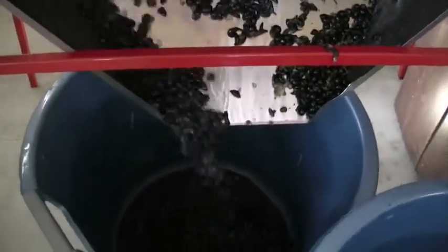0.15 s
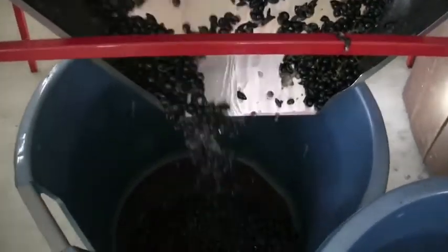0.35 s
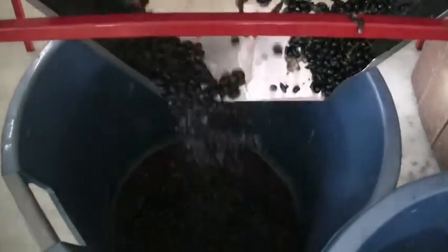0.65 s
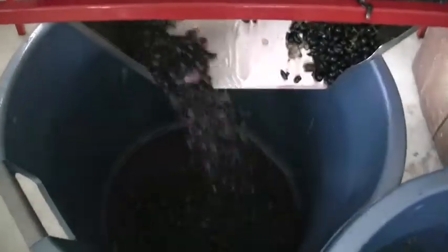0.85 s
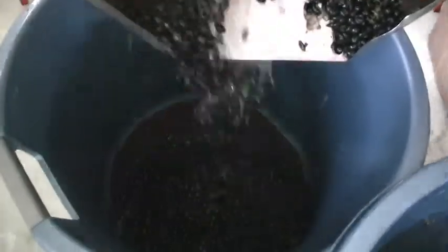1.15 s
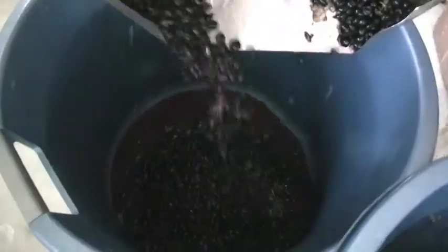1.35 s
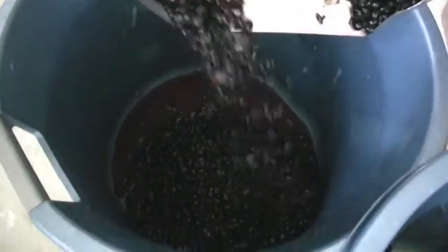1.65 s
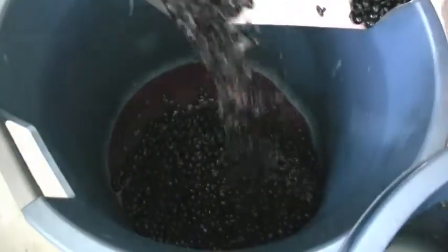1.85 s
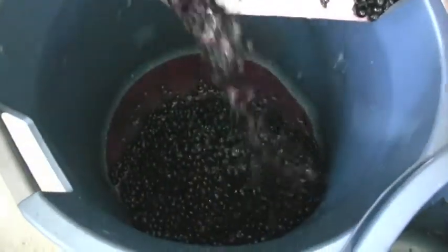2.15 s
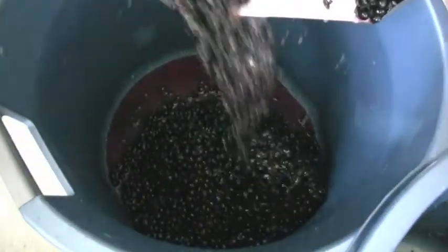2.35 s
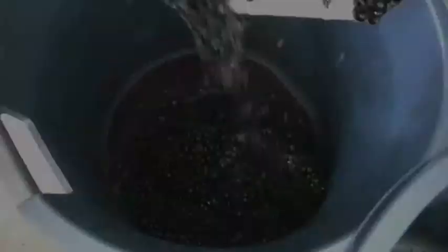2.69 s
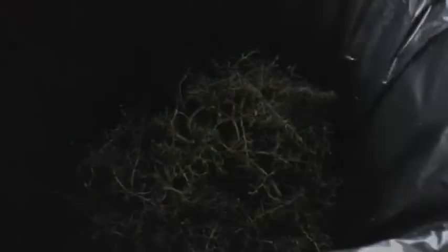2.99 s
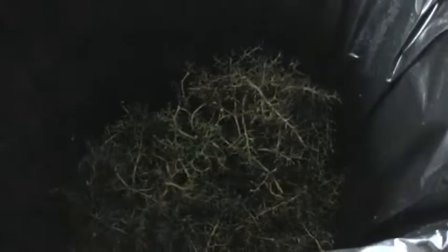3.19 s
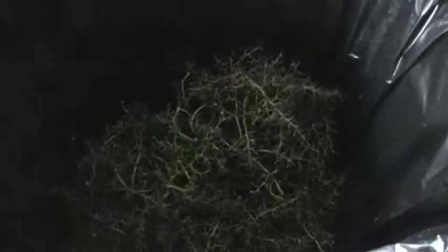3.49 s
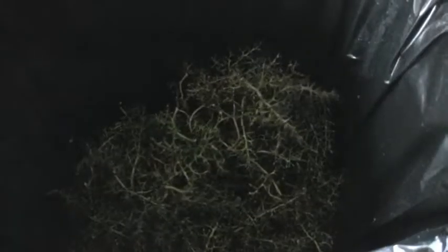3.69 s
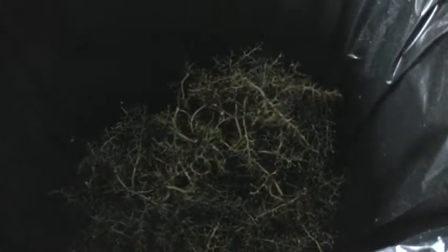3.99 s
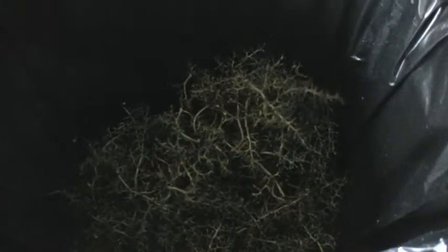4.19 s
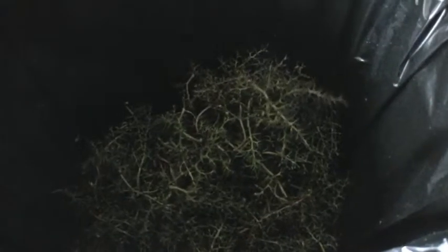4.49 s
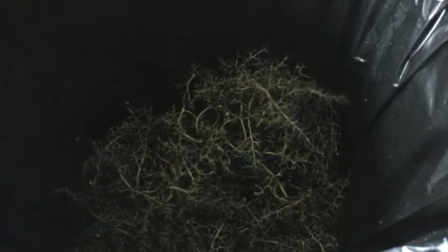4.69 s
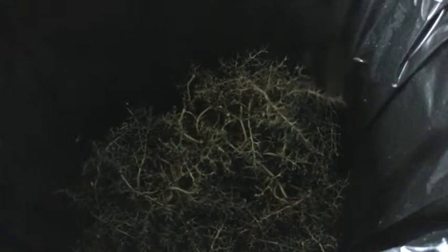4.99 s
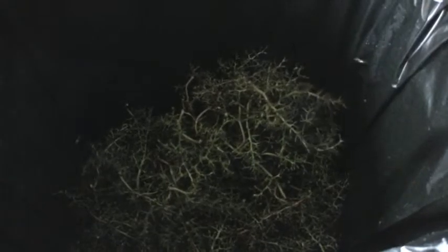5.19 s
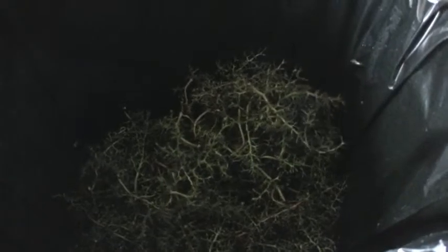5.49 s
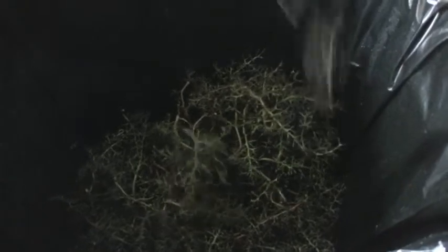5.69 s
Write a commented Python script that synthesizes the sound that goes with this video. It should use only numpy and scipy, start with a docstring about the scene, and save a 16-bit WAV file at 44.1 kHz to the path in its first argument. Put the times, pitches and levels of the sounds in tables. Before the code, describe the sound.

From the start to about 2.7 s, a grape crusher runs steadily, heard closely in stereo above a vat in a small hard-walled room. Its paddles make a dense, rough mid-low clatter, throbbing slightly about eight times a second, with irregular heavier thuds and a faint motor hum. Steel parts drone around 400 and 800 Hz, wavering, with a thin high rubbing ring. Over this, wet berries pour as a bright, wide shower of tiny clicks, with splats and sharp cracks growing busier from about 1 s and especially strong near 2.4 s. From 2.7 s everything fades, nearly silent just before 3 s. The booming panel rises first, and by 3.3 s the full machine is back above the stem bin: hollower, with uneven surges near 280 Hz and several knocks around 3.3 to 3.5 s. Dry stalks rustle faintly, with occasional small snaps, until the machine sound is cut off while still running at about 5.9 s.

```python
"""Grape crusher in a winery

A motor-driven crusher-destemmer runs in a small hard-walled winery. Its paddles beat bunches round a steel drum:
random knocks ring the housing, and narrow bands of noise make steel parts drone over the motor's humming sines.
First we are above the vat, where wet berries pour and splat as showers of tiny clicks.
After a fade almost to silence we are above the stem bin: the housing booms and stalks drop with a light rustle."""
import sys
import numpy as np
from scipy import signal
from scipy.fft import rfft, irfft, next_fast_len
from scipy.io import wavfile
from scipy.ndimage import uniform_filter1d, map_coordinates

SR = 44100
rng = np.random.default_rng(int(sys.argv[2]) if len(sys.argv) > 2 else 0)


def waveform_to_disk(signal):
    """Save audio, clipped to [-1, 1], as 16-bit WAV at the path in sys.argv[1]."""
    frames = np.transpose(np.atleast_2d(signal))
    scaled = np.clip(frames, -1, 1) * 32767
    samples = np.round(scaled).astype(np.int16)
    wavfile.write(sys.argv[1], SR, samples)


N = 257984
TIME = np.arange(N) / SR  # seconds
PADDED = 2 * next_fast_len(N // 2 + SR // 4)  # room for filters to ring out
FREQS = np.maximum(np.arange(PADDED // 2 + 1) * SR / PADDED, 1)  # Hz
VAT, BIN = 0, 1  # the two places; tables with two parts list the vat first

# All levels in the tables are relative: each sound's own settings can shift them.
# Ringing notes of the steel housing. Each row: pitch in Hz, width in Hz, boost in dB at the vat, then at the bin.
HOUSING_MODES = [(172, 23, 2, 1), (193.8, 14, 5.5, 7), (252, 7.8, 0, 1.5), (287.3, 93, 6.5, 14.5),
                 (346, 9.7, 5, 12.5), (401, 21, 2.5, 9), (474.4, 51, 4, 7.5), (497.5, 57, -4, 9),
                 (553, 41, 0, 5.5), (616, 91, 3.5, 8.5), (679.5, 61, -3, 8.5), (808, 170, 6.5, 8),
                 (912, 110, 2.5, 1.5), (1098, 138, 7, 4.5), (1198, 89, 7, 1.5), (1354, 85, 4, -6),
                 (1454, 134, 7, 7.5), (1682, 46, 7.5, 1.5), (1960, 160, 1.5, 0.5), (2230, 130, 7, 5),
                 (2963, 120, -3, 12), (7120, 630, 13, 9)]
# Broad colour of the blows. Each row: frequency in Hz, level in dB at the vat, then at the bin.
BLOW_COLOUR = [(30, -69, -44), (60, -25, -29), (98, -14, -20), (157, -4, -8.5), (264, -0.7, -2.5),
               (493, 3, -10), (1000, -11.5, -7.5), (1750, -12.5, -13.5), (2390, -25.5, -23.5),
               (3790, -29, -38), (6700, -46, -43), (9260, -34, -38), (11800, -51, -72)]
# Load on the paddles, one list per place. Each row: time in seconds, clatter level in dB.
LOAD = [
    [(0.0, -25.5), (2.7, -27)],
    [(3.3, -27), (5.85, -27.5)],
]
# Turning of the shaft, one row per place: turns per second, time of one throb's peak in seconds.
SHAFT = [(8.12, 0.102), (8.46, 3.213)]
# Beats of the clatter, one list per place. Each row: beats per turn of the shaft, depth in dB.
BEATS = [
    [(1, 0.35), (2, 0.4), (4, 0.3), (6, 0.35)],
    [(1, 0.6), (6, 0.5), (8, 0.45)],
]
# Heavy bunches thud on the housing. Each row: time in seconds, size in dB over the clatter's blows.
KNOCKS = [(0.303, 23), (0.614, 30), (1.09, 26), (1.28, 22), (1.504, 18), (1.75, 22), (2.034, 19),
          (2.095, 21), (2.177, 26), (3.286, 31.5), (3.404, 28.5), (3.445, 11), (3.546, 28), (3.82, 20),
          (4.368, 28), (4.66, 24), (4.753, 15), (5.089, 8), (5.412, 26)]
# Drone of the drum wall, one row per place: width in Hz, level in dB, throb depth in dB.
DRUM = [(29.7, 1.5, 1.2), (39.2, 2.5, 2.0)]
# How that drone shifts as bunches tumble, one list per place.
# Each row: time in seconds, pitch in Hz, level in dB.
DRUM_SWELL = [
    [(0.0, 410, -25.5), (0.05, 404.4, -27), (0.12, 438, -51), (0.19, 399.7, -36), (0.48, 408.7, -33),
     (0.55, 435, -49), (0.58, 426, -27.5), (0.65, 402, -40), (0.69, 435, -55), (0.72, 420.8, -32.5),
     (0.81, 394, -27.5), (0.86, 424, -44), (0.91, 401.2, -25.5), (1.04, 399.7, -40), (1.12, 385.8, -24),
     (1.21, 437.2, -34), (1.41, 389.8, -31), (1.44, 424.8, -30), (1.67, 435.5, -32), (1.71, 392, -28.5),
     (1.77, 433.4, -32), (1.95, 399, -29), (1.99, 431.2, -31.5), (2.2, 439, -29), (2.25, 417, -37),
     (2.34, 396.6, -27.5), (2.39, 397.6, -50), (2.43, 404.6, -28), (2.46, 399, -42), (2.53, 424.3, -29),
     (2.78, 421.1, -31), (2.8, 423.1, -31)],
    [(3.25, 449.4, -33), (3.36, 449.4, -25), (3.38, 445.7, -32.5), (3.94, 422.2, -34.5), (3.98, 415, -44),
     (4.06, 437.4, -35.5), (4.31, 415.7, -35), (4.54, 446.5, -31), (4.67, 414.7, -29), (4.81, 445.9, -36),
     (4.99, 421.6, -32), (5.03, 415.7, -45), (5.08, 442.4, -32), (5.24, 421.4, -27), (5.27, 414.4, -54),
     (5.33, 433.4, -33), (5.41, 455.6, -32.5), (5.73, 421.0, -35), (5.75, 415.7, -56), (5.85, 448, -36)],
]
# Uneven surges of the main panel at the bin. Each row: time in seconds, pitch in Hz, level in dB.
BOOM = [(2.97, 283, -46.5), (3.11, 280.7, -24.5), (3.23, 294.7, -34), (3.31, 277.7, -29),
        (3.39, 296.8, -22), (3.47, 297.3, -37), (3.53, 282.6, -25), (3.6, 281.6, -27), (3.63, 291.1, -19),
        (3.76, 284.3, -31), (3.81, 280.9, -23.5), (3.87, 287.9, -27), (3.92, 276.8, -24),
        (4.05, 283.9, -28.5), (4.08, 283.9, -23), (4.13, 295.6, -24), (4.2, 272.2, -34),
        (4.25, 280.3, -20.5), (4.37, 286.3, -22.5), (4.42, 279.6, -22.5), (4.61, 277.8, -28),
        (4.71, 288.5, -31), (4.75, 281.2, -19), (4.86, 280.7, -26), (4.88, 272.6, -46), (4.94, 282.8, -20),
        (4.97, 281.0, -26.5), (5.02, 292.5, -20), (5.06, 295.2, -36), (5.09, 297.2, -26),
        (5.18, 283.2, -29), (5.29, 281.5, -21), (5.32, 280.8, -25.5), (5.45, 297.3, -27.5),
        (5.49, 289.8, -45), (5.58, 274.8, -19), (5.64, 285.3, -32), (5.67, 281.2, -18.5),
        (5.76, 277.5, -27), (5.85, 285.5, -22.5)]
BOOM_NOTE_DB = 0  # driven note against the rough ringing
# A side plate of the chute singing at the vat. Each row: time in seconds, pitch in Hz, level in dB.
PLATE = [(0.0, 801, -37), (0.06, 820.3, -33.5), (0.76, 813, -39), (0.88, 816, -30.5), (0.94, 815, -47),
         (1.06, 817.4, -36), (1.21, 810.6, -46), (1.25, 814.5, -34), (1.41, 812.4, -31.5), (1.52, 816, -41),
         (1.55, 831, -31), (1.65, 821.4, -36), (1.68, 832, -48), (1.7, 828.7, -31), (1.77, 810, -46),
         (1.78, 812, -39), (2.05, 809, -32), (2.06, 800, -40), (2.24, 818, -31), (2.27, 811, -33),
         (2.61, 812, -35), (2.63, 816, -46), (2.68, 821, -38), (2.75, 824.3, -45)]
# Thin ring of rubbing steel at the vat. Each row: time in seconds, pitch in Hz, level in dB.
RUB = [(0.0, 2983, -49), (0.22, 2980, -50), (0.38, 2970, -53), (0.61, 3015, -48), (0.72, 2978, -52),
       (1.03, 2975, -46), (1.11, 2972, -53), (1.2, 2980, -45.5), (1.3, 3045, -44), (1.45, 2993, -49),
       (1.51, 2997, -42), (1.54, 2960, -45), (1.58, 2942, -37), (1.63, 2968, -51), (1.76, 3006, -40),
       (1.82, 2993, -50), (1.9, 2975, -39), (2.02, 3004, -43), (2.15, 2995, -50), (2.23, 3052, -41),
       (2.32, 3024, -51), (2.43, 2938, -39), (2.55, 3010, -47), (2.75, 2986, -47)]
# Flow of falling berries, then of falling stalks. Each row: time in seconds, level in dB.
POUR, STALKS = [
    [(0.0, -44.5), (0.46, -44.5), (0.6, -41.5), (1.24, -42.5), (1.57, -44.5), (1.67, -42), (2.49, -41.5),
     (2.58, -41), (2.69, -47.5)],
    [(3.28, -54), (3.43, -54), (4.25, -50.5), (4.4, -54), (4.79, -51), (4.91, -53.5), (5.8, -52)],
]
# Colour of the wet berries. Each row: frequency in Hz, level in dB per Hz.
WET = [(1200, -2), (2500, 9.5), (4000, 0), (5500, 0.5), (6950, -1.5), (7300, 4.5), (7600, 3), (9000, -2),
       (10300, -1.5), (12000, -9.5)]
# Colour of the dry stalks. Each row: frequency in Hz, level in dB per Hz.
DRY = [(1200, -4), (2500, 10.5), (4000, 2), (5500, -1.5), (6950, -4.5), (7250, 3), (7600, 1.5), (9000, -5),
       (10300, -2), (12000, -11.5)]
# Edges, in Hz, of the pitch bands for falling pieces, from large pieces to small.
GRAIN_BANDS_HZ = [1000, 2500, 4200, 7000, 13000]
# Clumps that land. Each row: time in seconds, peak in dB, length in seconds, brightness of the slap in dB.
SPLATS = [(0.161, -34, 0.092, -3), (0.58, -43, 0.081, 20), (0.596, -36, 0.05, 5), (0.758, -33, 0.06, 6),
          (0.943, -33.5, 0.051, 11), (1.021, -33, 0.074, -6), (1.06, -35, 0.071, 1), (1.18, -32, 0.076, -4),
          (1.261, -32, 0.17, -16), (1.338, -30, 0.052, -13), (1.386, -26.5, 0.035, -4),
          (1.41, -34, 0.053, 6), (1.496, -27, 0.043, -1), (1.55, -32, 0.055, 1), (1.748, -30, 0.037, -6),
          (1.856, -29.5, 0.042, -3), (2.021, -32, 0.044, 10), (2.242, -28, 0.079, -18),
          (2.371, -25.5, 0.023, 2), (2.438, -29, 0.046, 5), (2.461, -28.5, 0.044, 5),
          (2.615, -31, 0.058, -9), (2.697, -38, 0.075, 14), (4.039, -46, 0.06, 14), (4.561, -39, 0.085, -1)]
# Colour of the splats. Each row: frequency in Hz, level in dB per Hz.
SPLAT_COLOUR = [(700, 7), (2000, 18), (3500, 12.5), (6000, 7.5), (8500, -0.5), (10700, 6), (12000, -8)]
PAT_LOW_HZ, PAT_HIGH_HZ = 1395, 6620  # range of ticks from single pieces
# Berries burst and stalks snap against the steel. Each row: time in seconds, level in dB, centre in Hz,
# decay in seconds.
CRACKS = [(0.16, -27, 3500, 0.0045), (0.182, -34, 4400, .004), (0.197, -30, 7000, .004),
          (0.407, -33, 3700, 0.0032), (0.587, -26, 10500, 0.0029), (0.604, -24.5, 6930, 0.0074),
          (0.639, -30, 5200, 0.0042), (0.661, -31, 7200, .004), (0.73, -28, 3700, 0.0048),
          (0.81, -30, 5100, 0.0038), (0.946, -24, 10000, .004), (0.974, -34, 4200, 0.0039),
          (1.068, -27, 6500, .004), (1.083, -29, 4500, 0.0061), (1.185, -29, 3400, 0.0031),
          (1.248, -26, 4300, .004), (1.281, -31, 3747, .004), (1.294, -30, 4000, 0.0044),
          (1.348, -22, 3360, 0.0044), (1.386, -28, 4500, .004), (1.416, -30, 9500, .004),
          (1.497, -32, 5500, .003), (1.513, -35, 5000, 0.0028), (1.644, -27, 3990, .003),
          (1.684, -27, 4400, 0.0031), (1.752, -24, 4970, 0.0043), (1.871, -34, 3800, 0.0046),
          (1.918, -25, 6010, .003), (1.937, -26, 3600, .004), (1.952, -28, 4260, .003),
          (2.012, -27, 3784, .003), (2.03, -24, 5530, 0.0036), (2.159, -29, 9090, .003),
          (2.243, -29, 4020, 0.0038), (2.261, -22.5, 3537, 0.0047), (2.288, -34, 5200, .004),
          (2.339, -28, 7010, .003), (2.3735, -19.5, 10500, 0.0036), (2.374, -22, 2790, .005),
          (2.377, -21, 5177, .006), (2.449, -24, 9560, .004), (2.463, -29, 2900, 0.0045),
          (2.466, -32, 9000, 0.0038), (2.508, -28, 5110, .003), (2.536, -26, 5200, .004),
          (2.564, -27, 4400, 0.0044), (2.605, -27, 6130, 0.0029), (2.619, -27, 2900, .004),
          (2.634, -28, 4400, .004), (2.698, -32, 10410, .004), (2.711, -29, 4440, .004),
          (3.455, -32, 2500, .004), (3.513, -35, 7000, .004), (3.531, -31, 3200, .004),
          (3.927, -30, 3380, .004), (4.042, -43, 8000, .004), (4.191, -33, 2690, 0.0044),
          (4.247, -33, 4800, 0.0022), (4.261, -37, 2900, .004), (4.575, -28, 3407, .005),
          (4.597, -38, 5800, .004), (4.663, -29, 2200, .004), (4.751, -27.5, 3600, 0.0041),
          (5.069, -34, 2620, 0.0042), (5.192, -35, 4025, .003), (5.228, -28, 2600, .005),
          (5.414, -34, 3400, .004), (5.498, -33, 3966, .003), (5.788, -36, 5960, 0.0041),
          (5.836, -31, 2900, .004)]
# Pips and stalks flick against the steel. Each row: time in seconds, peak in dB, pitch in Hz, ring in seconds.
FLICKS = [(0.463, -32, 7360, 0.025), (0.764, -30, 7360, 0.059), (0.948, -39, 7970, 0.012),
          (1.282, -28, 4290, 0.015), (1.418, -35, 4310, 0.02), (2.633, -29, 4390, 0.018)]
# Motor hum. Each row: pitch in Hz, level in dB at the vat, then at the bin.
HUM = [(59, -86, -80), (121.9, -51.5, -53.5), (206.9, -44, -41), (239.2, -37.5, -50.5)]
# Stereo width. Each row: frequency in Hz, side minus mid in dB at the vat, then at the bin.
WIDTH = [(60, -33, -27), (190, -34.5, -32), (290, -16, -28.5), (410, -28, -21), (490, -11.5, -23),
         (600, -20, -27), (720, -15.5, -15), (1000, -14.5, -15), (1600, -35.5, -25), (3770, -33.5, -34),
         (5300, -20, -14), (6700, -7.5, -7), (9000, -3.5, -3), (12000, 2, -1)]
# Stereo lean. Each row: frequency in Hz, left minus right in dB.
LEAN = [(500, 0), (800, 1), (1100, 0.5), (5000, 0), (7000, 1.5), (9700, 4.5), (11000, 0.5), (12000, 0)]
ROOM_T60_S = 0.31  # time for the room's tail to drop 60 dB
FADE_OUT_S, CUT_S, FADE_IN_S = 2.71, 2.958, 3.29  # fade starts, place changes, fade ends
FADE_FLOOR_DB = -41  # where the fades bottom out
CUTOFF_HZ = 12100


def clatter(place, load, level_db, per_s, spread_db, wet_db):
    """Bunches knock on the drum, harder and softer in time with the shaft, and ring the steel housing."""
    turns_per_s, peak_s = SHAFT[place]
    beat_db = sum(db * throb(turns_per_s * beats, peak_s) for beats, db in BEATS[place])
    blows = contacts(per_s, spread_db)
    for s, db in KNOCKS:
        blows[int(s * SR)] += from_db(db)
    ringing_db = sum(db[place] / (1 + (2 * (FREQS - hz) / width) ** 2) for hz, width, *db in HOUSING_MODES)
    shaking = walls(room(blows, wet_db) * from_db(beat_db), echo_db=-10)
    sound = colour(shaking, in_hz(BLOW_COLOUR, column=place) + ringing_db)
    return steady(sound, 501, 1700, span_s=0.24) * from_db(in_time(load) + level_db)


def drum(place, contrast, span_s):
    """The drum wall drones, louder once per turn of the shaft; tumbling bunches shift its pitch and level."""
    width_hz, level_db, throb_db = DRUM[place]
    throbbing_db = level_db + throb_db * throb(*SHAFT[place])
    return singing(DRUM_SWELL[place], throbbing_db, width_hz, contrast, span_s, flutter_db=1.5)


def boom(level_db, width_hz, contrast, flutter_db):
    """The main panel is driven near its resonance; the driven note and rough ringing surge and flutter."""
    hz, shift_hz, swell_db = surges(BOOM, contrast)
    tone = np.sqrt(2) * from_db(BOOM_NOTE_DB) * np.sin(2 * np.pi * hz * TIME)
    note = tone * [[1], [0]]  # mid only
    ringing = drone(0, hz, width_hz, span_s=0.06)
    blend = steady(bend(ringing + note, shift_hz), hz / 2, hz * 2, span_s=0.07)
    return blend * from_db(swell_db + level_db + flutter_db * drift(30))


def side_plate():
    """A side plate of the chute resonates on and off, as a rough note with deep lulls."""
    return singing(PLATE, level_db=-2.2, width_hz=26, contrast=1.6, span_s=0.032, flutter_db=2.0)


def rubbing_steel():
    """Rubbing steel gives a thin, high ring: a wide resonance whose pitch and level waver."""
    return singing(RUB, level_db=-3.0, width_hz=160, contrast=1.0, span_s=0.025, flutter_db=2.5)


def falling(flow, spectrum, level_db, per_s, spread_db, clump_db, wet_db):
    """Countless small impacts: large pieces sound low, small ones high; each size comes in its own clumps."""
    flow_db = in_time(flow)
    density = per_s * from_db(flow_db - flow_db.mean())  # impacts per second in each band
    grains = 0
    for low_hz, high_hz in zip(GRAIN_BANDS_HZ, GRAIN_BANDS_HZ[1:]):
        clumped = contacts(density, spread_db) * from_db(clump_db * drift(50))
        grains = grains + band(clumped, low_hz, high_hz)
    sound = colour(room(grains, wet_db), in_hz(spectrum))
    return steady(sound, 3900, 10600, span_s=0.2) * from_db(flow_db + level_db)


def splats(level_db, rise_s, slap_db, slap_s, wet_db):
    """A landing clump slaps sharply and bursts into a quickly fading spray of tiny impacts."""
    spray = contacts(12000, spread_db=3.5)
    sharp = band(spray, 7400, 12500)
    out = np.zeros(N)
    for s, db, length_s, bright_db in SPLATS:
        part, t = stretch(s, SR // 4)
        fading = from_db(-20 * t / max(length_s / 2, .003))  # down 40 dB after its length
        burst = (1 - np.exp(-t / rise_s)) * fading
        slap = from_db(slap_db + bright_db) * np.exp(-t / slap_s)
        out[part] += from_db(db) * (burst * spray[part] + slap * sharp[part])
    return from_db(level_db) * colour(room(out, wet_db), in_hz(SPLAT_COLOUR))


def pats(flow, level_db, per_s, spread_db, cycles, wet_db):
    """Single berries or bits of stalk land, each with a short tick of a few cycles."""
    out = 0
    for hz in np.geomspace(PAT_LOW_HZ, PAT_HIGH_HZ, 12):
        b, a = signal.iirpeak(hz, max(cycles, 1), fs=SR)
        landings = room(contacts(per_s, spread_db), wet_db) + 1e-18
        out = out + signal.lfilter(b, a, landings) / np.sqrt(hz)
    return rms_one(out) * from_db(in_time(flow) + level_db)


def cracks(level_db, spread, wet_db):
    """Each crack is a noise burst of a few milliseconds round its own pitch, with a short tail from the room."""
    out = np.zeros(N)
    for s, db, hz, decay_s in CRACKS:
        part, t = stretch(s, SR // 20)
        burst = rng.choice([-1, 1], len(t)) * np.exp(-t / max(decay_s, .001))
        ratio = max(spread, 1.1)
        low_hz, high_hz = hz / ratio, min(hz * ratio, .45 * SR)
        even_out = np.sqrt(SR / 2 / (high_hz - low_hz))  # narrow bands would come out weaker
        out[part] += from_db(db) * band(burst, low_hz, high_hz) * even_out
    return from_db(level_db) * band(room(out, wet_db), 1700, 13000)


def flicks(level_db, wet_db):
    """Each hard little piece rings briefly at a pitch of its own."""
    out = np.zeros(N)
    for s, db, hz, ring_s in FLICKS:
        part, t = stretch(s, SR // 8)
        loudness = from_db(db - 30 * t / max(ring_s, .002))  # down 30 dB after the ring time
        out[part] += loudness * np.sin(2 * np.pi * hz * t)
    return from_db(level_db) * band(room(out, wet_db), 2000, 13000)


def motor(place, waver_db):
    """The motor and its drive hum at a few low pitches, wavering with the load."""
    hum = 0
    for hz, *db in HUM:
        loudness = from_db(db[place] + waver_db * drift(7.4))
        hum = hum + loudness * np.sin(2 * np.pi * hz * TIME + 0.6 * drift(3.3))
    return np.sqrt(2) * hum * [[1], [0]]  # mid only


def room(x, wet_db):
    """Mid and side: direct sound plus a noise tail, as impacts in different spots each get new echoes."""
    keep = from_db(-120 / (ROOM_T60_S * SR))  # acts on power, so 120 here is 60 dB of sound level
    lingering = np.sqrt(signal.lfilter([1 - keep], [1, -keep], x ** 2 + 1e-18))
    tail, side = lingering * rng.standard_normal((2, N))
    wet = from_db(wet_db)
    mid = (x + wet * tail) / np.sqrt(1 + wet ** 2)
    return np.array([mid, side])


def walls(x, echo_db):
    """Nearby walls send back a fixed cluster of early echoes, which combs the sound finely."""
    t = TIME[:SR // 8]
    echoes = rng.standard_normal(len(t)) * np.exp(-t / .04) * (t > .015)  # none before 15 ms
    echoes *= from_db(echo_db) / np.linalg.norm(echoes)
    return x + signal.fftconvolve(x, echoes[None], axes=1)[:, :N]


def singing(curve, level_db, width_hz, contrast, span_s, flutter_db):
    """A steel part sings in uneven swells and short pulses, its pitch always moving."""
    hz, shift_hz, swell_db = surges(curve, contrast)
    loudness_db = swell_db + level_db + flutter_db * drift(35)
    return bend(drone(loudness_db, hz, width_hz, span_s), shift_hz)


def drone(swell_db, hz, width_hz, span_s):
    """A steel part shaken without pause gives one rough, wavering note that swells and sinks."""
    b, a = signal.iirpeak(hz, hz / width_hz, fs=SR)
    shaking = room(contacts(2000, spread_db=2.5), wet_db=-5.5)
    fed = signal.lfilter(b, a, shaking)
    note = signal.lfilter(b, a, fed)  # fed and radiated through the same resonance
    return steady(note, hz / 2, hz * 2, span_s) * from_db(swell_db)


def surges(curve, contrast):
    """A ringing part's mean pitch, its shift from that pitch, and its level; contrast deepens the lulls."""
    s, hz, db = np.transpose(curve)
    loud_db = np.percentile(db, 75)
    swell_db = loud_db + contrast * (np.interp(TIME, s, db) - loud_db)
    return hz.mean(), np.interp(TIME, s, hz) - hz.mean(), swell_db


def bend(x, shift_hz):
    """Move a note's pitch up or down from moment to moment."""
    turning = np.exp(2j * np.pi * np.cumsum(shift_hz) / SR)
    return np.real(signal.hilbert(x, PADDED)[..., :N] * turning)


def contacts(per_s, spread_db):
    """Clicks at random moments, of random size and sign."""
    sizes = from_db(spread_db * np.minimum(rng.exponential(1, N), 4)) * rng.choice([-1, 1], N)
    return rms_one(sizes * (rng.random(N) < per_s / SR))


def throb(per_s, peak_s):
    """A regular swing between -1 and 1."""
    return np.cos(2 * np.pi * per_s * (TIME - peak_s))


def drift(rate):
    """Smooth random wandering with spread 1, through the given number of random points per second."""
    knots = rng.standard_normal(int(N / SR * rate) + 4)
    return rms_one(map_coordinates(knots, [TIME * rate + 1], order=3, mode="nearest"))


def colour(x, db):
    """Filter with the given gain per frequency; it never acts ahead of a blow, and its peaks ring after it."""
    cepstrum = irfft(np.log(from_db(db)), PADDED)
    cepstrum[1:PADDED // 2] *= 2  # folding everything forward in time gives minimum phase
    cepstrum[PADDED // 2 + 1:] = 0
    return irfft(rfft(x, PADDED) * np.exp(rfft(cepstrum)), PADDED)[..., :N]


def steady(x, low_hz, high_hz, span_s):
    """Even out a mid-side pair so that one band of the mid keeps a running level of 1."""
    power = uniform_filter1d(band(x[0], low_hz, high_hz) ** 2, max(int(span_s * SR), 2))
    return x / np.sqrt(np.maximum(power, 1e-12))


def band(x, low_hz, high_hz):
    """Keep only the pitches between two limits."""
    edges = [low_hz, min(high_hz, .45 * SR)]
    return signal.sosfilt(signal.butter(4, edges, "band", fs=SR, output="sos"), x)


def stretch(start_s, length):
    """The samples of one short event, and the seconds since it began."""
    part = slice(int(start_s * SR), min(int(start_s * SR) + length, N))
    return part, TIME[:part.stop - part.start]


def from_db(db):
    """Decibels to gain."""
    return 10 ** (np.asarray(db) / 20)


def rms_one(x):
    """Scale to an average power of 1."""
    return x / np.sqrt(np.mean(x ** 2) + 1e-20)


def in_time(rows):
    """A curve's value at every sample."""
    return np.interp(TIME, *np.transpose(rows))


def in_hz(rows, column=0):
    """A spectrum's value at every frequency."""
    hz, *values = np.transpose(rows)
    return np.interp(np.log(FREQS), np.log(hz), values[column])


def scene():
    """The machine from two places, one fading out before the other fades in."""
    at_vat = clatter(VAT, LOAD[VAT], level_db=-0.67, per_s=1100, spread_db=0.0, wet_db=0.5)
    at_vat += drum(VAT, contrast=1.0, span_s=0.016)
    at_vat += side_plate() + rubbing_steel()
    at_vat += falling(POUR, WET, level_db=-3.0, per_s=2600, spread_db=1.0, clump_db=2.5, wet_db=0.0)
    at_vat += pats(POUR, level_db=-8.5, per_s=13, spread_db=-2.0, cycles=6, wet_db=-5)
    at_vat += motor(VAT, waver_db=3.0)

    at_bin = clatter(BIN, LOAD[BIN], level_db=-0.38, per_s=1100, spread_db=0.5, wet_db=2.5)
    at_bin += drum(BIN, contrast=0.65, span_s=0.063)
    at_bin += falling(STALKS, DRY, level_db=-0.5, per_s=3800, spread_db=3.5, clump_db=2.5, wet_db=7.0)
    at_bin += pats(STALKS, level_db=-5, per_s=8.6, spread_db=-2.5, cycles=5.9, wet_db=11)
    at_bin += motor(BIN, waver_db=2.0)

    landings = splats(level_db=-4.5, rise_s=0.0033, slap_db=-3, slap_s=0.0088, wet_db=2.0)
    landings += cracks(level_db=-9.5, spread=1.4, wet_db=-9)
    landings += flicks(level_db=-4.0, wet_db=-4)

    floor = from_db(FADE_FLOOR_DB)
    fade_out = np.clip((CUT_S - TIME) / (CUT_S - FADE_OUT_S), floor, 1) * (TIME <= CUT_S)
    fade_in = np.clip((TIME - CUT_S) / (FADE_IN_S - CUT_S), floor, 1) * (TIME > CUT_S)
    # the square root lets the boom come up sooner than the rest
    booming = np.sqrt(fade_in) * boom(level_db=-1.0, width_hz=47, contrast=1.16, flutter_db=1.16)
    places = [fade_out * (at_vat + landings), fade_in * (at_bin + landings) + booming]

    stereo = 0
    for place, (mid, side) in enumerate(places):
        spread_out = colour(side, in_hz(WIDTH, column=place))
        stereo = stereo + mid + spread_out * [[1], [-1]]  # left gets plus, right gets minus
    return stereo


def record(dry):
    """The two microphones differ in the treble; the top is cut."""
    lean_db = in_hz(LEAN) / 2 * [[1], [-1]]
    heard = irfft(rfft(dry, PADDED) * from_db(lean_db), PADDED)[:, :N]
    return signal.sosfilt(signal.ellip(10, .2, 90, CUTOFF_HZ, fs=SR, output="sos"), heard)


dry = scene()
out = record(dry)
waveform_to_disk(out)
```